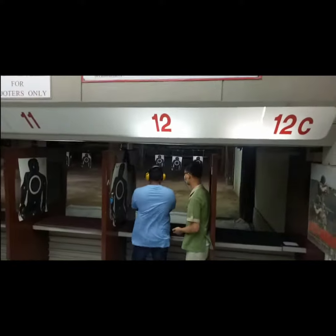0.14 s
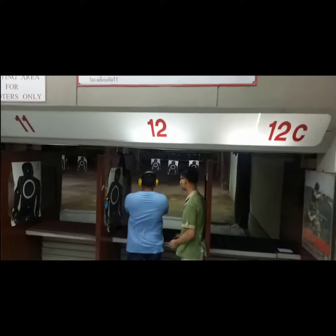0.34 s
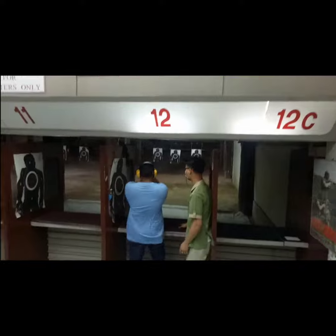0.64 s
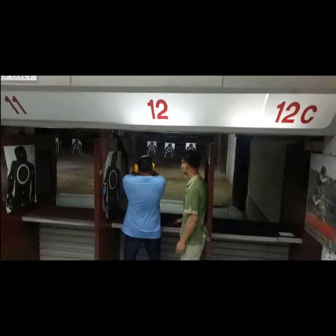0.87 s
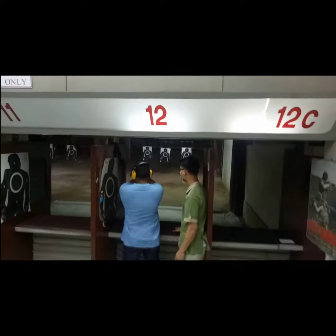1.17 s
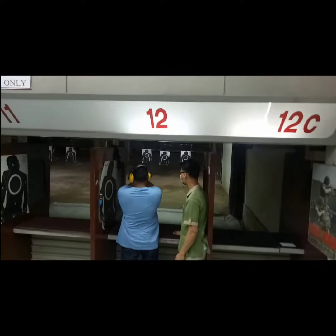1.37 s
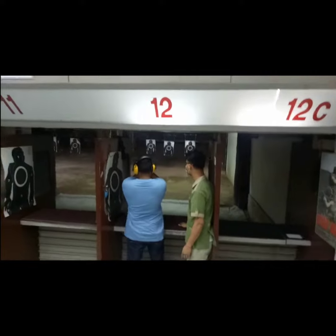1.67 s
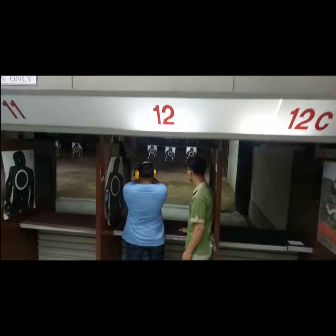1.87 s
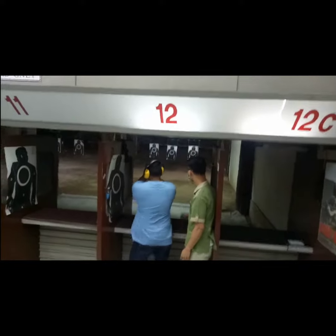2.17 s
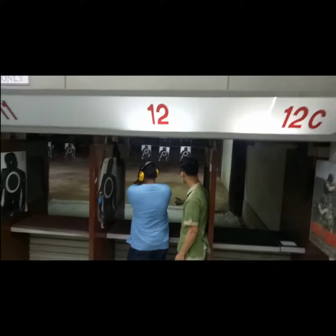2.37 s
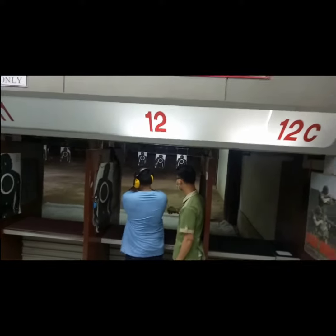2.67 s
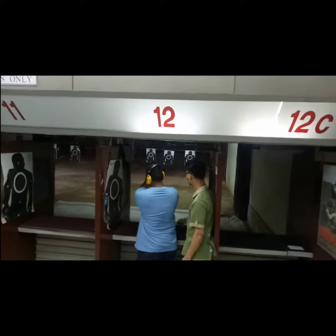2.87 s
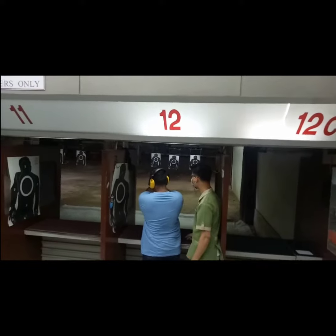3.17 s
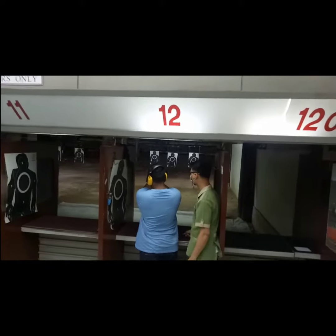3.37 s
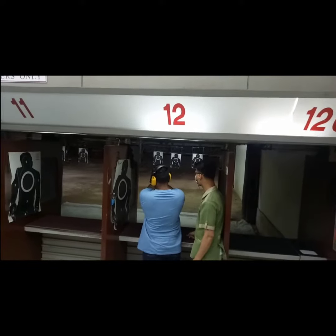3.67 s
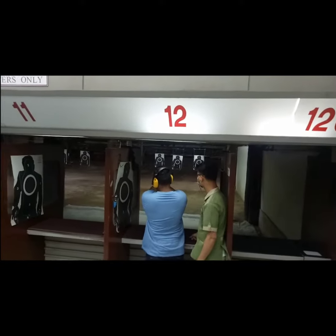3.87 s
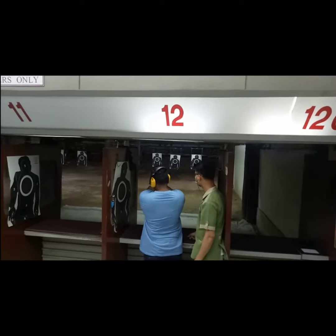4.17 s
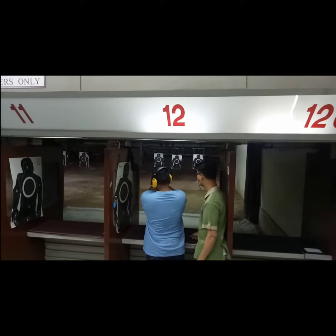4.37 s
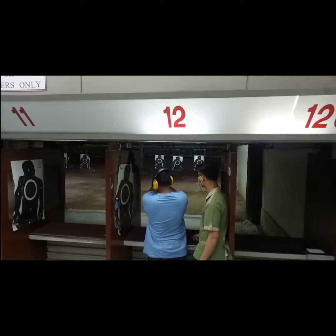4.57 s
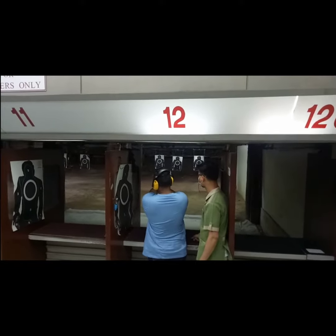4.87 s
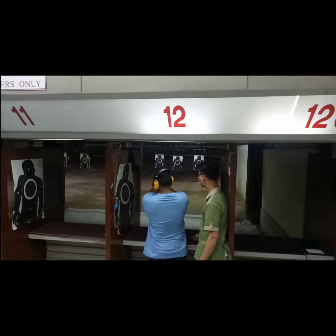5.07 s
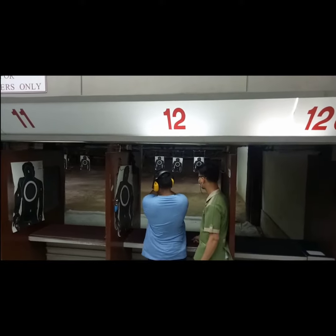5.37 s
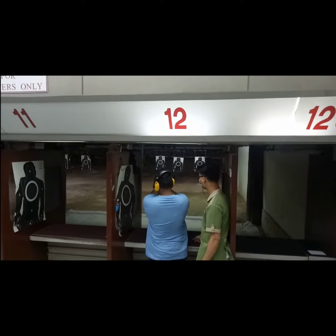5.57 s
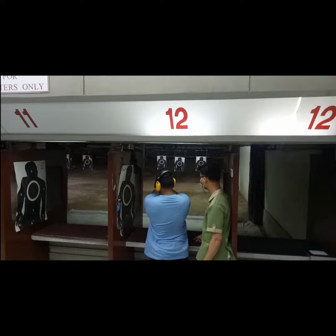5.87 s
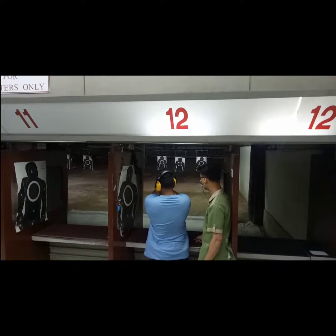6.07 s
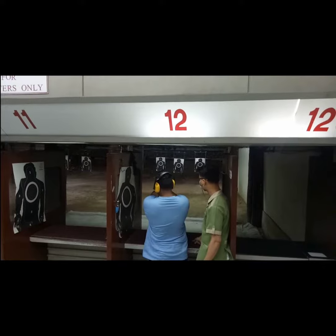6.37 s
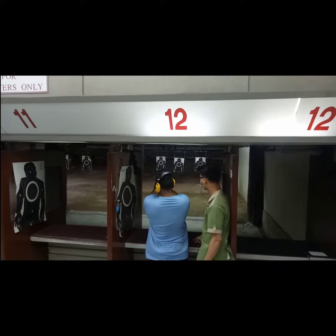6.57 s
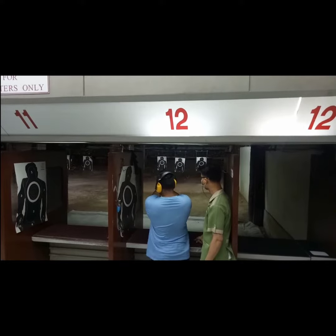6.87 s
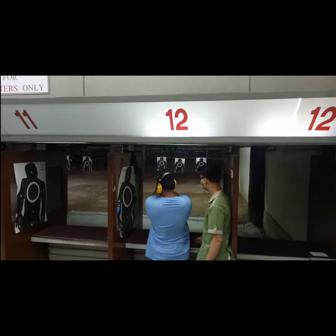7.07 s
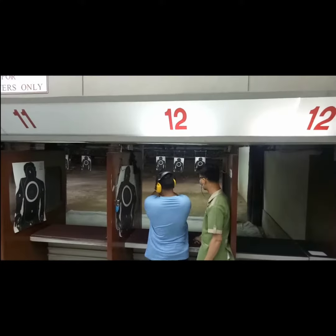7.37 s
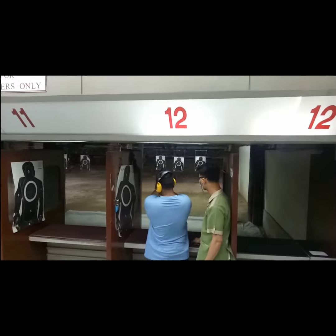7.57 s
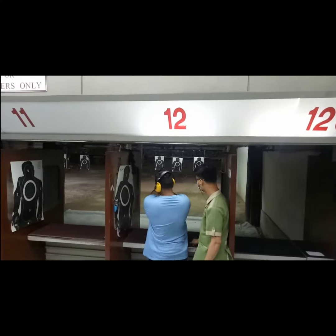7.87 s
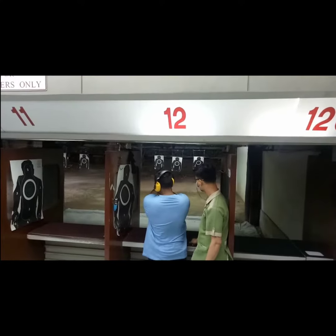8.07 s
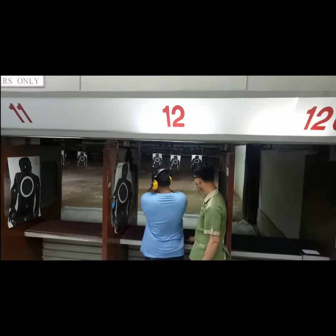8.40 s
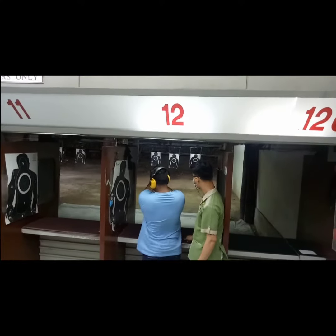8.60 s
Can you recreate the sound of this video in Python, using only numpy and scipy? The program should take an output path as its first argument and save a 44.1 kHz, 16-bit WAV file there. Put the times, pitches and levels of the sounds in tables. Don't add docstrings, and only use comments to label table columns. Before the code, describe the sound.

Fans roar and a worn motor whines in an indoor shooting range; three overloaded pistol shots crack about two seconds apart, each with dense echo.

```python
import sys
import numpy as np
from scipy import signal
from scipy.io import wavfile
from scipy.ndimage import uniform_filter1d

SR = 44100
rng = np.random.default_rng(int(sys.argv[2]) if len(sys.argv) > 2 else 0)


def log_audio(samples):
    frames = np.atleast_2d(samples).T
    limited = np.clip(frames, -1, 1)
    pcm = np.round(limited * 32767).astype(np.int16)
    wavfile.write(sys.argv[1], SR, pcm)


def natural_amplitude(level_db):
    exponent = np.asarray(level_db, float) / 20
    return 10 ** exponent


N = 385434
PORT_LAG = 11


def rms_one(x):
    return x / np.sqrt(np.mean(x ** 2) + 1e-20)


def at_hz(rows, hz, axis=1):
    rows = np.array(rows)
    return np.interp(np.log(hz), np.log(rows[:, 0]), rows[:, axis])


def sides(pan_db):
    return natural_amplitude(np.array([[0.5], [-0.5]]) * pan_db)


def drift(rate_hz):
    coarse = 40
    r = np.exp(-2 * np.pi * rate_hz * coarse / SR)
    noise = rng.standard_normal(N // coarse + 2002)
    slow = signal.lfilter([1], [1, -2 * r, r * r], noise)[2000:]
    slow = rms_one(slow - slow.mean())
    return np.interp(np.arange(N) / coarse, np.arange(len(slow)), slow)


def bands(alike_table, lag=0, size=N):
    edges = 22 * 2 ** np.arange(0, 9.3, 0.4)
    white = rng.standard_normal((2, 3, size))
    for k, (low, high) in enumerate(zip(edges, edges[1:])):
        band = signal.butter(2, [low, high], "band", fs=SR, output="sos")
        shared, left, right = signal.sosfilt(band, white[k % 2])
        hz = np.sqrt(low * high)
        alike = np.clip(at_hz(alike_table, hz), 0, 1)
        common = np.array([shared, np.roll(shared, lag)])
        own = np.array([left, right])
        yield hz, np.sqrt(alike) * common + np.sqrt(1 - alike) * own


def whistle(hz, width_hz):
    r, w = np.exp(-np.pi * width_hz / SR), 2 * np.pi * hz / SR
    resonance = [0.99, 0, -1.006, 1, -2 * r * np.cos(w), r * r]
    return rms_one(signal.sosfilt([resonance] * 2, rng.standard_normal((2, N))))


# start in seconds, stop in seconds.
SPELL_TIMES = [
    (-1, 1.9),
    (1.8, 4.04),
    (5.15, 6.45),
    (7.01, 7.84),
]


def spells():
    spin_up_s, run_down_s = 0.12, 0.1
    start, stop = np.array(SPELL_TIMES).T[:, :, None]
    t = np.arange(N) / SR
    since = np.maximum(t - start, 0)
    coasting = np.exp(-np.maximum(t - stop, 0) / run_down_s)
    return np.minimum(since / spin_up_s, 1) * coasting, since


def airflow_db(running):
    level_db, relief_db = -29.5, 2.34
    cold_db, warm_s = -2, 0.73
    resting = 1 - np.minimum(running.sum(axis=0), 1)
    warming = cold_db * np.exp(-np.arange(N) / SR / warm_s)
    return level_db + warming + relief_db * uniform_filter1d(resting, size=SR // 3)


# frequency in Hz, level in dB per Hz.
FAN_COLOUR = [(18, -51), (30, -4.5), (49, -38), (107, -9.5), (335, -1.5), (455, -7.5), (632, -7),
              (756, -9.5), (836, -7), (1620, -13), (3560, -16), (4140, -3), (5770, -28.5), (13000, -115.5)]
# frequency in Hz, left-right likeness (1 = identical).
FAN_ALIKE = [(60, 0.96), (180, 0.89), (520, 1), (1540, -0.067), (4520, 0.01), (13300, -0.2)]
# frequency in Hz, left-right difference in dB.
FAN_PAN = [(60, 12), (150, 3.5), (360, 5.5), (890, 4), (2200, 11.5), (5420, -1.5), (13300, 3)]
# frequency in Hz, width in Hz, level in dB.
DUCT_TONES = [(220.4, 19, -68), (272, 30, -48.5), (142.2, 10.7, -52), (344, 34, -43.5), (625, 130, -42.5),
              (848.7, 45, -44), (1059, 25, -50)]


def fans(running):
    together = drift(1.9)
    roar = np.zeros((2, N))
    for hz, noise in bands(FAN_ALIKE, PORT_LAG):
        level_db = at_hz(FAN_COLOUR, hz) + 0.08 * together + 1.7 * drift(5.4)
        roar += noise * sides(at_hz(FAN_PAN, hz)) * natural_amplitude(level_db)
    hum = sum(natural_amplitude(db) * whistle(hz, width_hz) for hz, width_hz, db in DUCT_TONES)
    shared_hum = np.array([hum[0], np.roll(hum[0], PORT_LAG)])
    return natural_amplitude(airflow_db(running)) * rms_one(roar) + (0.52 * shared_hum + 0.5 * hum) * sides(3.7)


# frequency in Hz, level in dB.
BLADE_TONES = [(227.6, -42.5), (263.6, -49), (288, -46), (171, -58), (148.6, -54)]


def blades():
    tones = np.zeros(N)
    for hz, db in BLADE_TONES:
        level = np.sqrt(2) * natural_amplitude(db + 1.03 * drift(2.2))
        phase = 2 * np.pi * np.cumsum(hz + 0.82 * drift(3.4)) / SR
        tones += level * np.sin(phase)
    return np.array([tones, np.roll(tones, PORT_LAG)]) * sides(7.3)


# frequency in Hz, width in Hz, level in dB, left-right difference in dB.
WHINE_MODES = [(2666, 99, -12.5, 11.5), (3390, 980, -2.5, 6.5), (4024, 130, -1.5, 8), (4277, 310, 0, 1),
               (4760, 200, -10, -15), (5332, 220, -1.5, -2), (6165, 350, -12.5, -14), (6860, 270, -7, 2),
               (8010, 67, -19.5, -1), (8920, 300, -25, 7), (9090, 180, -21.5, 16.5),
               (10470, 97, -22.5, 18.5), (11070, 150, -19.5, 11), (11770, 460, -16.5, 13.5),
               (12600, 250, -20, 6)]
# whine in dB, brightness in dB per octave, vent hiss in dB.
SPELLS = [
    (-35, -4, -34.5),
    (-32, -2.2, -39),
    (-31.5, -2.6, -41.5),
    (-35, -1.7, -42),
]


def whine(running, since):
    idle_db, surge_db, surge_s = -46.5, 2, 0.13
    level_db, bright_db = np.array(SPELLS)[:, :2].T
    tilt_db = bright_db @ running
    surging = running * natural_amplitude(surge_db * np.exp(-since / surge_s))
    gain = natural_amplitude(idle_db) + np.sqrt(natural_amplitude(2 * level_db) @ surging ** 2)
    rings = np.zeros((2, N))
    for hz, width_hz, db, pan_db in WHINE_MODES:
        wavering_db = db + 0.42 * drift(26.0) + tilt_db * np.log2(hz / 4000)
        rings += whistle(hz, width_hz) * sides(pan_db) * natural_amplitude(wavering_db)
    return gain * natural_amplitude(0.52 * drift(19)) * rms_one(rings)


def jet(running):
    idle_db = -42
    hiss_db = np.array(SPELLS)[:, 2]
    blowing = np.sqrt(natural_amplitude(2 * idle_db) + natural_amplitude(2 * hiss_db) @ running ** 2)
    return blowing * whistle(2510, 1400.0) * sides(8.6)


# middle in seconds, half length in seconds, frequency in Hz, level in dB.
SQUEAKS = [
    (2.575, .045, 3272, -38),
    (5.7, .33, 2640, -45),
    (2.51, .05, 2720, -43),
]


def squeaks():
    out = np.zeros(N)
    level_db, waver_hz = 1.5 * drift(16.0), 9.2 * drift(15.4)
    for s, half_s, hz, db in SQUEAKS:
        span = np.arange(round((s - 2 * half_s) * SR), round((s + 2 * half_s) * SR))
        swell = np.exp(-((span / SR - s) / half_s) ** 4)
        tone = np.sin(2 * np.pi * np.cumsum(hz + waver_hz[span]) / SR)
        out[span] += np.sqrt(2) * natural_amplitude(db + level_db[span]) * swell * tone
    return out * sides(4.0)


# time in seconds, blast in dB, echo in dB, echo brightness in dB per octave.
SHOTS = [
    (4.546, -27, 6.5, -1),
    (6.407, -20, 7.5, -1),
    (8.5812, -25, 6, -1),
]


def blast():
    out = np.zeros(N + SR)
    pulse = np.linspace(1, -1, round(0.00081 * SR))
    slaps = [(0, -44), (0.0011, -22), (0.0023, -8), (0.0042, 37)]   # (delay s, dB)
    for s, db, *_ in SHOTS:
        for late_s, slap_db in slaps:
            i = round((s + late_s) * SR)
            out[i:i + len(pulse)] += natural_amplitude(db + slap_db + 7.0) * pulse
    return out[:N] * sides(5.0)


# frequency in Hz, level in dB per Hz.
ECHO_COLOUR = [(18, -47), (30, -18), (295, -8), (432, -2), (478, -16.5), (557, 4.5), (795, -4), (1020, 0.5),
               (2090, -4.5), (4470, -3.5), (13000, -40)]
# frequency in Hz, build-up in seconds, early time to fall 60 dB in seconds,
# late time to fall 60 dB in seconds, late share in dB.
GALLERY = [(60, 0.01, 0.36, 1.1, -26), (262, 0.0067, 0.49, 1.66, -23), (630, 0.016, 0.49, 1.17, -11.5),
           (1320, 0.0036, 0.47, 1.03, -11.5), (2900, 0.0022, 0.52, 1.76, -24),
           (5300, 0.001, 0.49, 2.1, -26), (10800, .0007, 0.27, 0.51, -63)]
# frequency in Hz, left-right likeness.
ECHO_ALIKE = [(60, 0.37), (230, 0.73), (890, 0.2), (3450, -0.14), (13300, -0.34)]
# frequency in Hz, left-right difference in dB.
ECHO_PAN = [(100, 7.5), (500, 5), (1500, 11), (4000, 4.5), (10000, -13)]


def echo():
    out = np.zeros((2, N))
    first = round(SHOTS[0][0] * SR)
    for hz, noise in bands(ECHO_ALIKE, size=N - first):
        rise_s, early_s, late_s = (max(at_hz(GALLERY, hz, axis=k), 1e-4) for k in (1, 2, 3))
        late_db = at_hz(GALLERY, hz, axis=4)
        gain = sides(at_hz(ECHO_PAN, hz)) * natural_amplitude(at_hz(ECHO_COLOUR, hz) + 29.0)
        noise = noise * natural_amplitude(1.5 * drift(12.7)[first:])
        for s, _, echo_db, tilt_db in SHOTS:
            i = round(s * SR)
            t = np.arange(min(N - i, 3 * SR // 2)) / SR
            build_up = 1 - np.exp(-t / rise_s)
            draining = natural_amplitude(-60 * (t / early_s) ** 1.446)
            far_end = (1 - np.exp(-(t / 0.52) ** 2)) * natural_amplitude(late_db - 60 * t / late_s)
            shape = build_up * (draining + far_end)
            level = gain * natural_amplitude(echo_db + tilt_db * np.log2(hz / 1000))
            out[:, i:i + len(t)] += level * shape * noise[:, i - first:i - first + len(t)]
    return out


def scene():
    running, since = spells()
    machines = fans(running) + blades() + whine(running, since) + jet(running) + squeaks()
    return machines + blast() + echo()


def limiter(x):
    ceiling_db, release_db_s = -6.0, 18.0
    ahead = round(0.0075 * SR)
    excess_db = np.maximum(20 * np.log10(np.abs(x).max(axis=0) + 1e-9) - ceiling_db, 0)
    ramp = release_db_s * np.arange(N) / SR
    held = np.maximum.accumulate(excess_db + ramp) - ramp
    early = np.append(held[ahead:], [held[-1]] * ahead)
    duck_db = signal.lfilter([0.012], [1, -0.988], early)
    return x * natural_amplitude(-duck_db)


# resonance in Hz, width in Hz, share added.
RIGHT_PORT = (5170, 2300, 0.35)


def microphones(dry):
    top = 1.595 * sides(2.96)
    hot = dry / top
    clipped = top * hot / (1 + np.abs(hot) ** 2.213) ** (1 / 2.426)
    hz, width_hz, share = RIGHT_PORT
    cavity = signal.iirpeak(hz, hz / width_hz, fs=SR)
    clipped[1] += share * signal.lfilter(*cavity, clipped[1])
    return clipped


def low_pass(x):
    return signal.sosfilt(signal.butter(12, 13930, fs=SR, output="sos"), x)


def record(dry):
    limited = limiter(microphones(dry))
    dulled = signal.sosfilt(signal.butter(2, [45, 9000], "band", fs=SR, output="sos"), limited)
    mix = signal.sosfilt(signal.ellip(10, 0.5, 60, 12900, fs=SR, output="sos"), dulled)
    return low_pass(mix)


dry = scene()
out = record(dry)
log_audio(out)
```